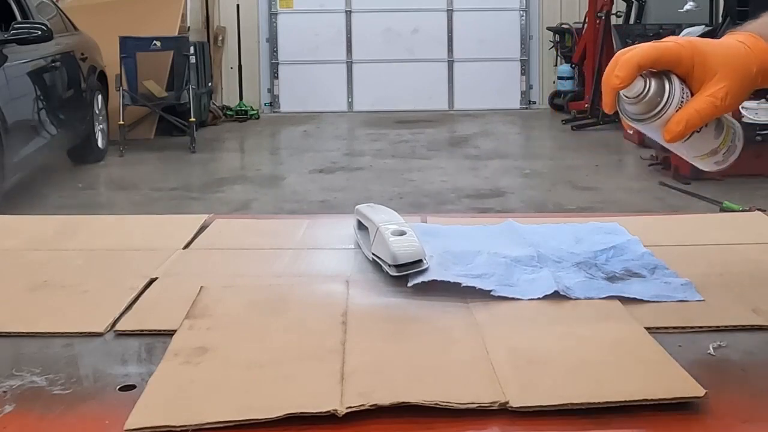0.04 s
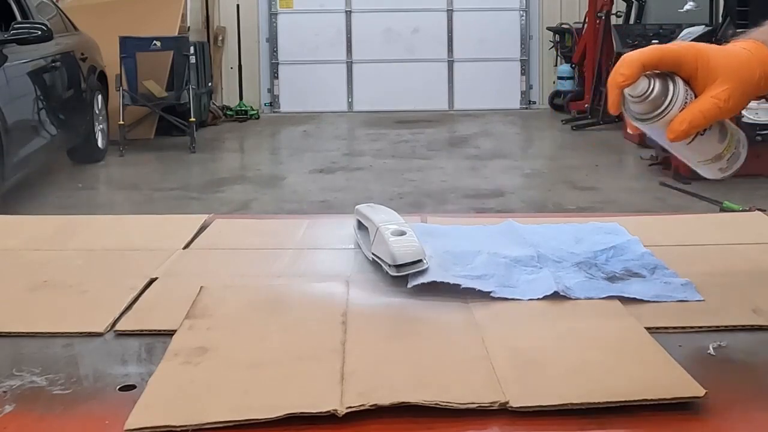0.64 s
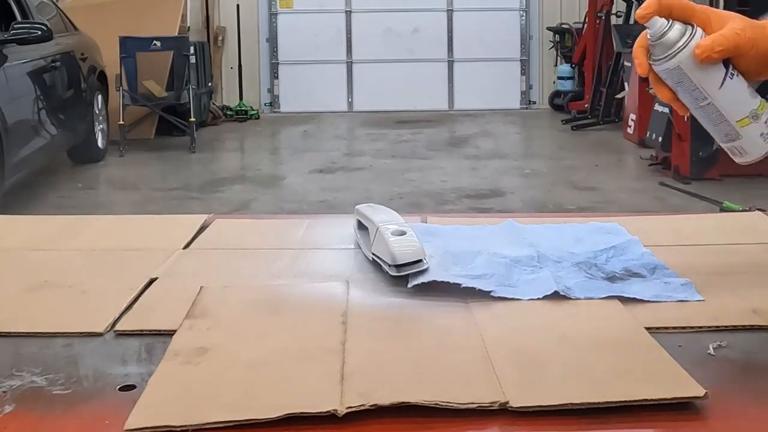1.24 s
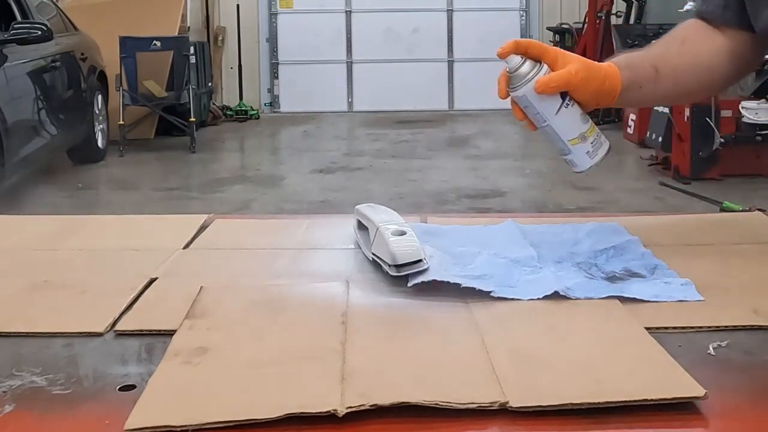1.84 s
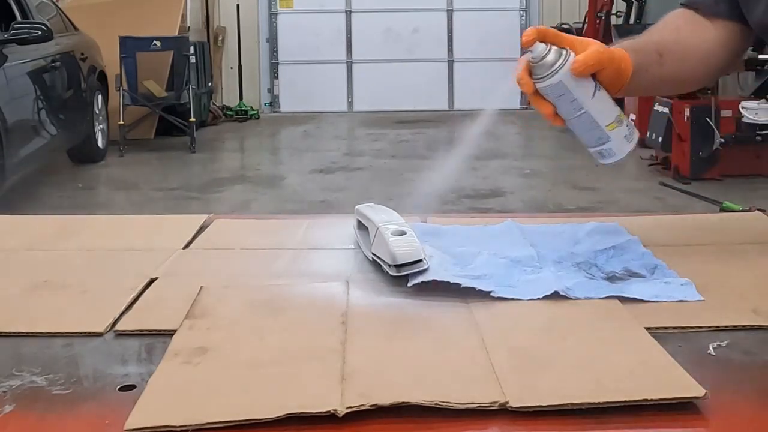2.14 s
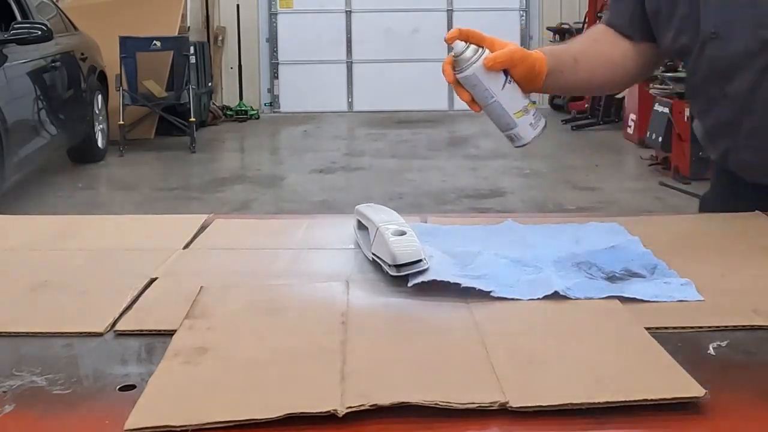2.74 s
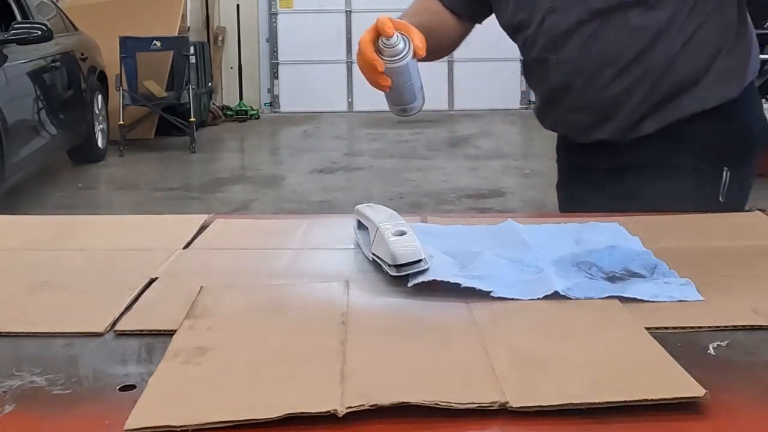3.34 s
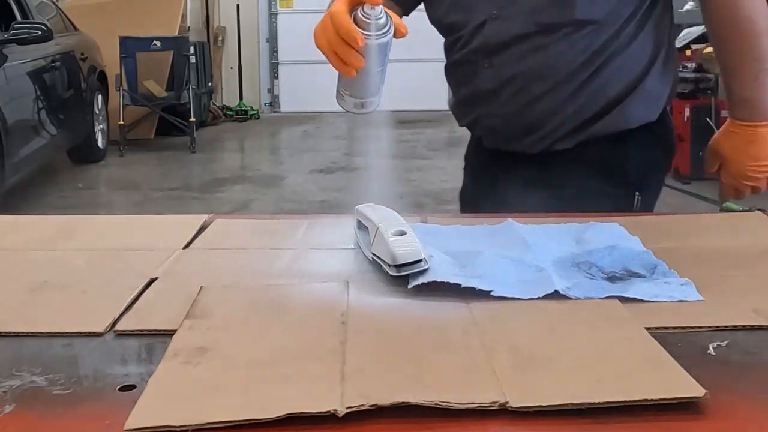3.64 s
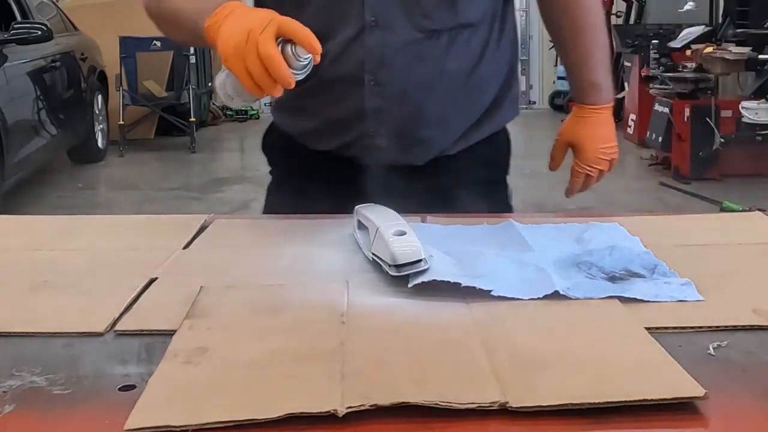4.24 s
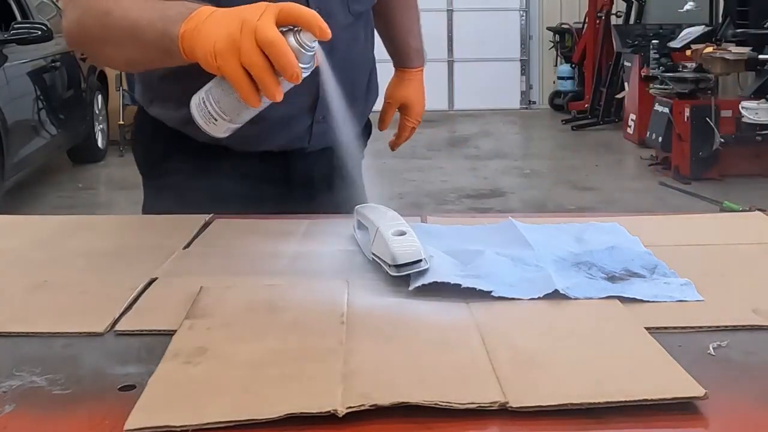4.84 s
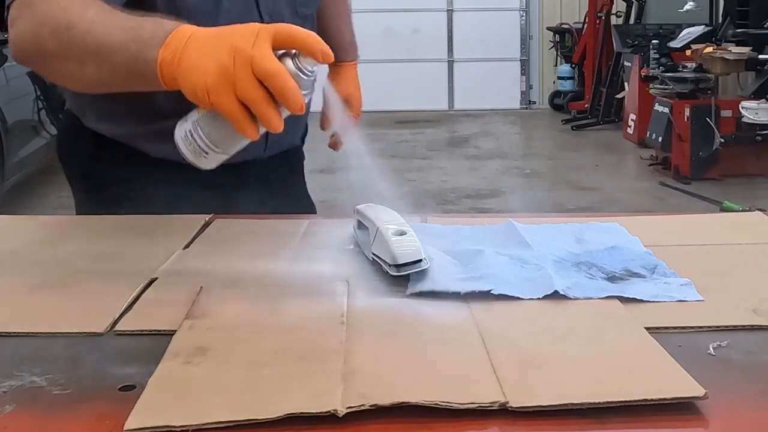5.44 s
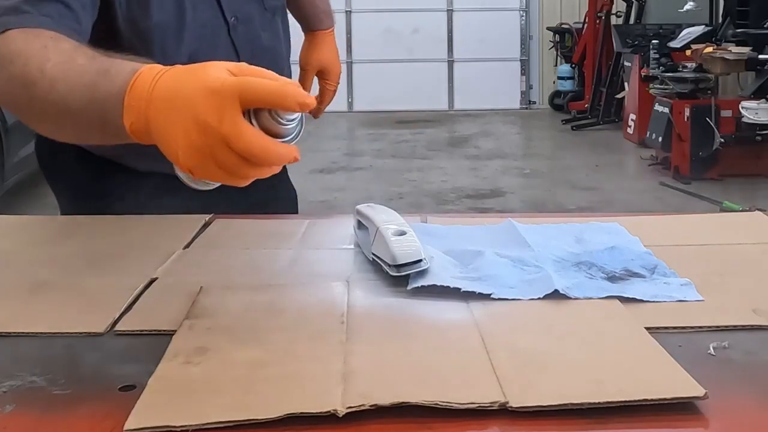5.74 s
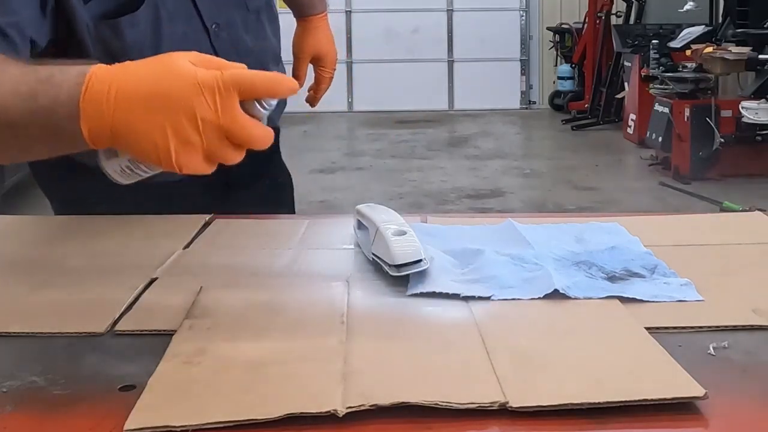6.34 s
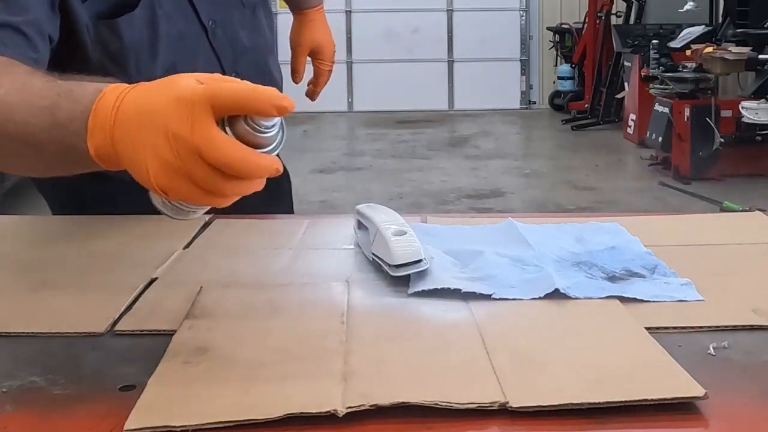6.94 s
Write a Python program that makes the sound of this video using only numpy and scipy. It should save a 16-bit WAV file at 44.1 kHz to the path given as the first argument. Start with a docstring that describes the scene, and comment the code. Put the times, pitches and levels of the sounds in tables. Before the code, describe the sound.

In a hard-walled garage with a low machine hum, a can ticks lightly in the hand, then sprays in brief, bright hisses, twelve in all, in uneven groups. The nearby hiss shifts in tone as the hand sweeps and leaves a short echo. Soft swishes, faint rustling, scuffs and two dull footsteps sit in the gaps, and a far engine rises slowly twice underneath.

```python
"""A spray can sweeps over a stapler on cardboard in twelve short bursts, in an echoing garage workshop.
Each burst spits as the valve opens, hisses as a turbulent jet and splutters shut; a close reflection
combs the hiss as the hand moves. Can ticks, soft swishes, faint rustles, scuffs and two soft steps come
between. Machines hum; a far engine pulls twice, slowly gathering speed."""
import sys
import numpy as np
from scipy import signal
from scipy.fft import rfft, irfft, next_fast_len
from scipy.io import wavfile
from scipy.ndimage import map_coordinates

SR = 44100
rng = np.random.default_rng(int(sys.argv[2]) if len(sys.argv) > 2 else 0)


def generate_wav(signal):
    """Clip the signal to [-1, 1] and save it as 16-bit WAV at the path in sys.argv[1]."""
    frames = np.transpose(np.atleast_2d(signal))
    scaled = np.clip(frames, -1, 1) * 32767
    pcm = np.round(scaled).astype(np.int16)
    wavfile.write(sys.argv[1], SR, pcm)


N = 316638
TIME = np.arange(N) / SR
FFT_SIZE = next_fast_len(N + 2 * SR)
FREQS = np.maximum(np.arange(FFT_SIZE // 2 + 1) * SR / FFT_SIZE, 1)
SIDES = np.array([[1], [-1]])   # left, right

# nozzle presses: open/s, close/s, hiss/dB, then re hiss: surge/dB, treble/dB, rush/dB,
# opening spit/dB, closing splutter/dB
PRESSES = [ (0.216, 0.397, -45.5, 7, 0, -20.5, 4, -16), (0.579, 0.745, -45.5, 7, 0, -22, -2.5, -4),
           (1.571, 1.881, -45.5, 4.5, 0.5, -19, -11, -10), (2.105, 2.308, -47, 5, 3, -14.5, -12, 3.5),
           (2.493, 2.705, -47.5, 6, 3, -17.5, 3.5, -10), (3.473, 3.795, -46.5, 4, 3, -18, -2, 2),
           (4.001, 4.199, -46.5, 8, 2, -22.5, 6.5, 0.5), (4.405, 4.768, -45, 3, 2.5, -17, 2.5, -3),
           (4.936, 5.147, -43, 4.5, 0, -12.5, 2, -22), (5.338, 5.674, -46, 5, 4, -15.5, 7, 2.5),
           (6.249, 6.433, -43.5, 3.5, -0.5, -18, 0, -3), (6.709, 6.876, -44, 5, 0, -19, 1, -11)]
# left-right likeness of near sources: f/Hz, correlation
NEAR_CORRELATION = [(600, 0.98), (2000, 0.91), (7000, 0.78), (10500, 0.92), (12500, -0.18), (14000, 0.0012)]
# left-right likeness of the hall: f/Hz, correlation
HALL_CORRELATION = [(60, 1), (130, .98), (290, 0.74), (640, 0.18), (1400, 0.53), (3100, 0.66), (6800, 0.75),
                    (11000, 0.65), (15000, 0.041)]


def from_db(db):
    """Decibels to gain."""
    return 10 ** (np.asarray(db) / 20)


def at_hz(points, hz=FREQS):
    """Interpolate a table over log frequency."""
    knots_hz, values = np.transpose(points)
    return np.interp(np.log(hz), np.log(knots_hz), values)


def in_time(rows):
    """Interpolate each value column at every sample."""
    times_s, *columns = np.transpose(rows)
    return [np.interp(TIME, times_s, column) for column in columns]


def colour(x, gain):
    """Filter by a gain per FFT bin."""
    return irfft(rfft(x, FFT_SIZE) * gain, FFT_SIZE)[..., :N]


def drift(rate_hz):
    """Random curve, rate_hz knots a second, spread 1."""
    knots = rng.standard_normal(4000)
    position = np.linspace(0, rate_hz * N / SR, N)
    return map_coordinates(knots, [position], order=1, mode="wrap") * np.sqrt(3 / 2)


def unit_rms(x):
    """Scale to rms 1."""
    return x / np.sqrt(np.mean(x ** 2) + 1e-20)


def noise(spectrum, correlation=NEAR_CORRELATION):
    """Stereo noise of given spectrum and left-right correlation, rms 1."""
    mid, side = rfft(rng.standard_normal((2, FFT_SIZE)))
    alike = np.clip(at_hz(correlation), -1, 1)
    stereo = np.sqrt(1 + alike) * mid + np.sqrt(1 - alike) * side * SIDES
    return unit_rms(irfft(stereo * from_db(at_hz(spectrum)), FFT_SIZE)[:, :N])


def resonate(x, hz, width_hz):
    """Two-pole resonance, peak gain 1."""
    radius = np.exp(-np.pi * width_hz / SR)
    numerator = np.array([1, 0, -1]) * (1 - radius ** 2) / 2
    denominator = [1, -2 * radius * np.cos(2 * np.pi * hz / SR), radius ** 2]
    return signal.lfilter(numerator, denominator, x + 1e-18)


def band_noise(hz, width_hz):
    """Noise through two equal resonances in series, rms 1."""
    once = resonate(rng.standard_normal(N), hz, width_hz)
    return unit_rms(resonate(once, hz, width_hz))


def swell(centre_s, length_s):
    """Gaussian envelope, peak 1."""
    return np.exp(-2 * np.minimum(np.abs(TIME - centre_s) / length_s, 10) ** 2)


def swells(rows):
    """Sum of swells from rows of t/s, length/s, level/dB."""
    return sum(from_db(level_db) * swell(at_s, length_s) for at_s, length_s, level_db in rows)


def fade(start_s, decay_s):
    """Sudden onset, exponential decay."""
    return (TIME >= start_s) * np.exp(-np.clip((TIME - start_s) / decay_s, 0, 20))


def tone(hz, rms_db, wobble_rad=0.037):
    """Sine with slightly wandering phase."""
    phase = 2 * np.pi * (hz * TIME + rng.random()) + wobble_rad * drift(13.0)
    return np.sqrt(2) * from_db(rms_db) * np.sin(phase)


def machines(rumble_db=-43.0, air_db=-62, whine_hz=(1200, 1680)):
    """Motor hum and two thin electrical tones over rumble and moving air."""
    # spectra of rumble and moving air: f/Hz, level/dB
    rumble = [(12, -30), (25, 11.5), (38, 1.5), (58, 10.5), (80, 8.5), (105, -1), (140, -7.5), (200, -15),
              (300, -24), (1000, -49), (4000, -110)]
    air = [(100, -3), (200, -3), (300, -7), (450, -14), (800, -22), (1300, -18.5), (1800, -19), (2500, -26),
           (4000, -31), (7000, -34), (10000, -42), (15000, -55)]
    # motor tones: f/Hz, level/dB, waver/dB
    hum = [(49.8, -43, 1.8), (120.2, -52, 1.6), (180.7, -70.5, 3), (241, -73, 3)]
    # wavering whine: t/s, lower tone/dB, upper tone/dB
    whine = [(0, -72, -72), (.7, -71.5, -74), (1.15, -75, -79), (2.05, -71, -71), (2.7, -71, -77),
             (3.15, -71.5, -72), (3.4, -71.5, -75), (3.8, -70.5, -70.5), (4.3, -73.5, -71), (5, -73, -67),
             (5.45, -73, -72), (5.8, -74, -67), (6.15, -76.5, -72.5), (6.9, -73.5, -70)]
    out = from_db(rumble_db) * noise(rumble, HALL_CORRELATION)
    out += from_db(air_db) * noise(air, HALL_CORRELATION)
    for hz, level_db, waver_db in hum:
        out += tone(hz, level_db + waver_db * drift(5))
    for hz, level_db in zip(whine_hz, in_time(whine)):
        out += tone(hz, level_db)
    return out


def swishes(grain_db=1.1, grain_hz=120):
    """Soft, grainy swishes; the first is a fading wash at the start."""
    # swishes: t/s, length/s, level/dB
    events = [(0.0, 0.19, -55.5), (4.373, 0.091, -56.5), (4.852, 0.034, -45.5), (4.897, 0.035, -53)]
    # swish spectrum: f/Hz, level/dB
    spectrum = [(300, -6.5), (800, -13.5), (1900, 2), (3000, -5.5), (4300, -9), (7000, -18), (11000, -29),
                (15000, -42)]
    return swells(events) * noise(spectrum) * from_db(grain_db * drift(grain_hz))


def rustles(grit_db=1.4, grit_hz=200):
    """Faint, dry, high rustles."""
    # rustles: t/s, length/s, level/dB
    events = [(0.024, 0.22, -51.5), (2.784, 0.06, -57.5), (3.01, 0.21, -62.5), (5.975, 0.075, -63)]
    # rustle spectrum: f/Hz, level/dB
    spectrum = [(1000, -18), (2200, -6), (3100, -1), (4200, 2), (5200, -4), (7300, -4), (9000, -11),
                (11000, -13), (15000, -32)]
    return swells(events) * noise(spectrum) * from_db(grit_db * drift(grit_hz))


def garage_echo(x, onset_s=0.006, length_s=1.8):
    """Diffuse tail of a hard-walled hall; each band decays at its own rate."""
    # reverberation time: f/Hz, T60/s
    t60 = [(200, 1.2), (1000, 1.4), (2500, 1.2), (5000, 1.2), (8000, 1.2), (12000, 1.05), (16000, .7)]
    # echo colour: f/Hz, gain/dB
    echo_gain = [(200, -13.5), (1000, -0.5), (2500, -4), (5000, -6), (7500, -7.5), (8500, -13.5),
                 (12000, -13.5), (16000, -10)]
    age_s = TIME[:int(length_s * SR)]
    count = len(age_s)
    white = rfft(noise([(20, 0), (20000, 0)], HALL_CORRELATION)[:, :count])
    bins_hz = np.arange(count // 2 + 1) * SR / count
    edges_hz = np.geomspace(100, 17000, 15)
    tail = 0
    for low_hz, high_hz in zip(edges_hz, edges_hz[1:]):
        band = irfft(white * ((bins_hz >= low_hz) & (bins_hz < high_hz)), count)
        decay = from_db(-60 * age_s / at_hz(t60, np.sqrt(low_hz * high_hz))) * (age_s > onset_s)
        tail += band * decay / np.sqrt(np.sum(decay ** 2))
    return colour(x, rfft(tail, FFT_SIZE) * from_db(at_hz(echo_gain)))


def can_ticks(decay_s=0.0017):
    """Brief gritty contacts ring the can; a softer touch is duller."""
    # contacts in the hand: t/s, drive/dB, low-pass f/Hz
    contacts = [(0.0305, -35, 7000), (0.0393, -27.5, 9500), (0.059, -39, 7000), (0.0767, -27, 9500),
                (0.1043, -33.5, 9000), (0.118, -34, 9500), (0.1349, -30.5, 9000), (0.156, -38, 9000),
                (0.833, -41.5, 4500), (2.763, -33.5, 5000), (6.0585, -37.5, 4700)]
    # hand-damped modes of can and cap: f/Hz, width/Hz, gain/dB
    modes = [(1860, 400, -10), (3010, 600, 0), (3600, 600, -3), (4270, 380, 2.5), (6260, 1100, -3),
             (7600, 700, -3), (10200, 1200, -10)]
    grit = rng.standard_normal(N)
    touch = np.zeros(N)
    for at_s, drive_db, top_hz in contacts:
        dulled = signal.sosfilt(signal.butter(4, top_hz, fs=SR, output="sos"), grit)
        touch += from_db(drive_db) * fade(at_s, decay_s) * dulled
    return sum(from_db(gain_db) * resonate(touch, hz, width_hz) for hz, width_hz, gain_db in modes)


def valve(open_s=0.029, curve=1.44, close_s=0.018, surge_at_s=0.023, surge_s=0.038, sag_db_per_s=2.5):
    """Flow, surge, treble and rush envelopes; pressure stored in the stem gives each press a surge."""
    flow, surge, treble, rush = np.zeros((4, N))
    for start_s, stop_s, hiss_db, surge_db, treble_db, rush_db, *_ in PRESSES:
        shut_s = stop_s + close_s
        on = (TIME >= start_s) & (TIME < shut_s)
        age_s = TIME[on] - start_s
        opening = np.clip(age_s / open_s, 0, 1) ** curve
        closing = np.clip((shut_s - TIME[on]) / close_s, 0, 1)
        surge[on] = np.exp(-((age_s - surge_at_s) / surge_s) ** 2)
        flow[on] = opening * closing * from_db(hiss_db + surge_db * surge[on] - sag_db_per_s * age_s)
        treble[on] = from_db(treble_db)
        # jet nearest the cardboard at mid-sweep
        rush[on] = from_db(hiss_db + rush_db) * np.sin(np.pi * age_s / (shut_s - start_s))
    return flow, surge, treble, rush


def spray(sputter_db=1.02, sputter_hz=180, treble_hz=5000, ring_lift_db=11):
    """Turbulent nozzle hiss, roughened by droplets, and its rush on the cardboard."""
    # spectra of the jet and its rush on cardboard: f/Hz, level/dB
    jet_spectrum = [(300, -41), (700, -19.5), (1000, -11.5), (1400, -5), (1900, -3), (2700, -1), (3300, -2),
                    (4800, -3), (6600, -0.5), (7700, 0), (8500, -2), (10500, -1.5), (12500, -6.5),
                    (15500, -22)]
    rush_spectrum = [(100, -26), (250, 0.5), (500, -2), (1000, -11.5), (2000, -8.5), (8000, -55)]
    # nozzle resonances, lifted by the surge: f/Hz, half-width/Hz, level/dB
    nozzle_modes = [(2700, 110, -23), (6560, 890, -16)]
    flow, surge, treble, rush = valve()
    jet = noise(jet_spectrum)
    for hz, half_width_hz, level_db in nozzle_modes:
        jet += from_db(level_db + ring_lift_db * surge) * band_noise(hz, 2 * half_width_hz)
    # treble is beamed, so it varies with the can's aim
    jet += (treble - 1) * colour(jet, 1 / (1 + (treble_hz / FREQS) ** 4))
    droplets = from_db(sputter_db * drift(sputter_hz))
    return jet * flow * droplets + rush * noise(rush_spectrum)


def close_reflection(hiss, highpass_hz=3200, tremor_ms=0.008):
    """A small nearby surface returns the short waves and combs the hiss; hand tremor jitters the lag."""
    # reflection along the hand's sweep: t/s, lag/ms, gain
    sweep = [(.22, .39, .55), (.4, .42, .55), (.6, .435, .5), (.75, .395, .5), (1.58, .385, .5),
             (1.73, .305, .62), (1.88, .28, .7), (2.11, .28, .62), (2.31, .32, .6), (2.5, .315, .65),
             (2.71, .27, .65), (3.5, .265, .62), (3.64, .305, .62), (3.8, .395, .55), (4.0, .4, .5),
             (4.2, .36, .45), (4.42, .31, .65), (4.59, .34, .5), (4.77, .42, .4), (4.94, .41, .45),
             (5.15, .33, .38), (5.34, .33, .38), (5.51, .375, .5), (5.68, .4, .58), (6.25, .39, .28),
             (6.44, .36, .28), (6.71, .39, .35), (6.88, .41, .3)]
    lag_ms, gain = in_time(sweep)
    bright = colour(hiss, 1 / (1 + (highpass_hz / FREQS) ** 2))
    read_at = np.arange(N) - (lag_ms + tremor_ms * drift(20)) * SR / 1000
    return gain * np.array([map_coordinates(side, [read_at], order=3) for side in bright])


def opening_spits(hz=2700, width_hz=580, delay_s=0.0225, length_s=0.0068):
    """The half-open valve chirps, more or less with each press."""
    envelope = sum(from_db(hiss_db + spit_db) * swell(start_s + delay_s, length_s)
                   for start_s, _, hiss_db, *_, spit_db, _ in PRESSES)
    return envelope * band_noise(hz, width_hz)


def closing_splutters(build_s=0.0099, cut_s=0.0028):
    """The last paint splutters through the narrowing valve, cut off with a dry click."""
    # splutter spectrum: f/Hz, level/dB
    splutter = [(500, -20), (1400, -7), (2200, -5), (2750, 0), (3400, -6), (5000, -13), (9000, -16),
                (15000, -32)]
    envelope = np.zeros(N)
    for _, stop_s, hiss_db, *_, splutter_db in PRESSES:
        length_s = np.where(TIME < stop_s, build_s, cut_s)
        envelope += from_db(hiss_db + splutter_db) * swell(stop_s, length_s)
    return envelope * noise(splutter)


def far_engine(climb_hz_per_s=4.5, fade_s=0.19, rough_db=1.0, wander_hz=1.0,
               mode_hz=76.55, mode_half_width_hz=1.4, mode_db=9.5):
    """A vehicle's rising firing note comes through the door and booms as it crosses a hall mode."""
    # engine pulls: start/s, stop/s, initial firing f/Hz, level/dB
    pulls = [(0.79, 2.21, 89.8, -60), (3.201, 6.704, 70.47, -48.5)]
    out = np.zeros(N)
    for start_s, stop_s, start_hz, level_db in pulls:
        firing_hz = start_hz + climb_hz_per_s * (TIME - start_s)
        load = np.clip(np.minimum(TIME - start_s, stop_s - TIME) / fade_s, 0, 1)
        boom_db = mode_db / (1 + ((firing_hz - mode_hz) / mode_half_width_hz) ** 2)
        phase = 2 * np.pi * np.cumsum(firing_hz + wander_hz * drift(14)) / SR
        out += np.sqrt(2) * load * from_db(level_db + boom_db + rough_db * drift(6.9)) * np.sin(phase)
    return out


def steps(landing_s=0.003):
    """Soft, dull footfalls on concrete."""
    # footfalls: t/s, level/dB, decay/s
    footfalls = [(2.144, -37.5, 0.02), (5.902, -40.5, 0.022)]
    # thud spectrum: f/Hz, level/dB
    thud = [(100, -2), (170, 1.5), (280, 6.5), (360, -5), (450, -19), (700, -33), (2000, -70)]
    weight = sum(from_db(level_db) * fade(at_s, decay_s) * np.clip((TIME - at_s) / landing_s, 0, 1)
                 for at_s, level_db, decay_s in footfalls)
    return weight * noise(thud)


def scuffs(hz=1750, width_hz=1400, grit_db=3.0, grit_hz=150):
    """A sole catches on the concrete in a few gritty slips."""
    # sole slips: t/s, length/s, level/dB
    slips = [(2.925, 0.018, -56.5), (2.963, 0.03, -57.5), (3.04, 0.08, -62.5), (3.18, 0.1, -70)]
    return swells(slips) * band_noise(hz, width_hz) * from_db(grit_db * drift(grit_hz))


def edge_tones():
    """Brief airy whistles where the jet grazes an edge, and one extra 2.7 kHz chirp of the valve as it opens."""
    # whistles, and the valve chirp at 6.312 s: t/s, length/s, f/Hz, width/Hz, level/dB
    whistles = [(4.436, 0.02, 6900, 1100, -37), (4.484, 0.059, 6570, 900, -46),
                (4.671, 0.025, 1880, 200, -49.5), (6.312, 0.015, 2690, 500, -42),
                (6.413, 0.019, 1890, 200, -44)]
    return sum(from_db(level_db) * swell(at_s, length_s) * band_noise(hz, width_hz)
               for at_s, length_s, hz, width_hz, level_db in whistles)


def scene(splutter_send_db=-5):
    """Bench work, its echoes and the background."""
    hiss, splutters = spray(), closing_splutters()
    bench = hiss + opening_spits() + edge_tones() + can_ticks()
    bench += rustles() + swishes() + steps() + scuffs()
    reflection = close_reflection(hiss)
    # the closing valve excites the hall less than the jet does
    echo = garage_echo(bench + from_db(splutter_send_db) * splutters)
    return bench + splutters + reflection + echo + machines() + far_engine()


def record(dry, cutoff_hz=15400):
    """Two microphone ports of unequal colour, then a steep low-pass."""
    # port balance: f/Hz, left minus right/dB
    balance = [(100, 0), (500, -3), (1200, 1), (2500, 0), (8000, 1), (10500, 2.5), (12000, 7.5),
               (14000, 0.5)]
    heard = colour(dry, from_db(SIDES * at_hz(balance) / 2))
    return colour(heard, 1 / np.sqrt(1 + (FREQS / cutoff_hz) ** 200))


dry = scene()
out = record(dry)
generate_wav(out)
```